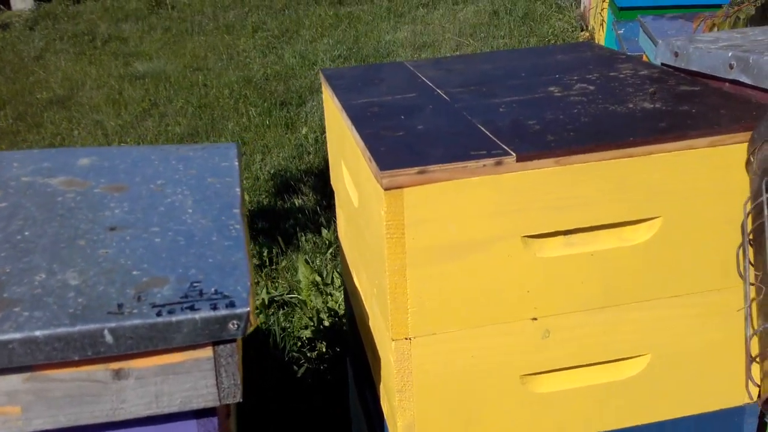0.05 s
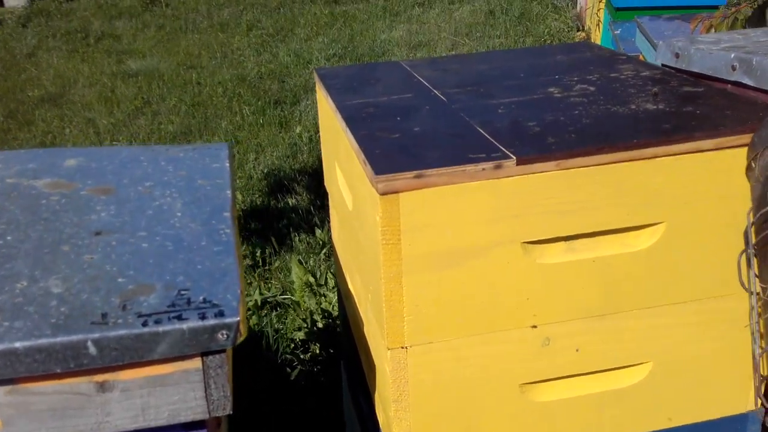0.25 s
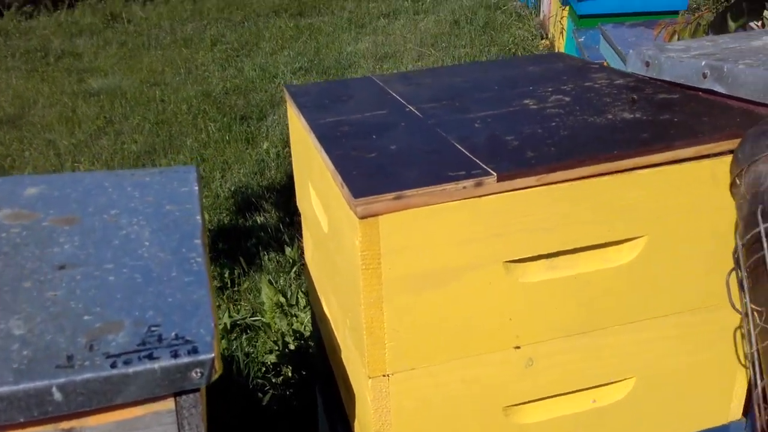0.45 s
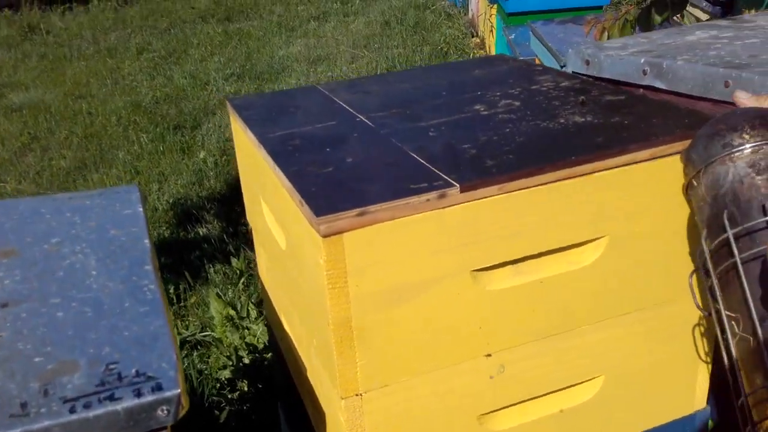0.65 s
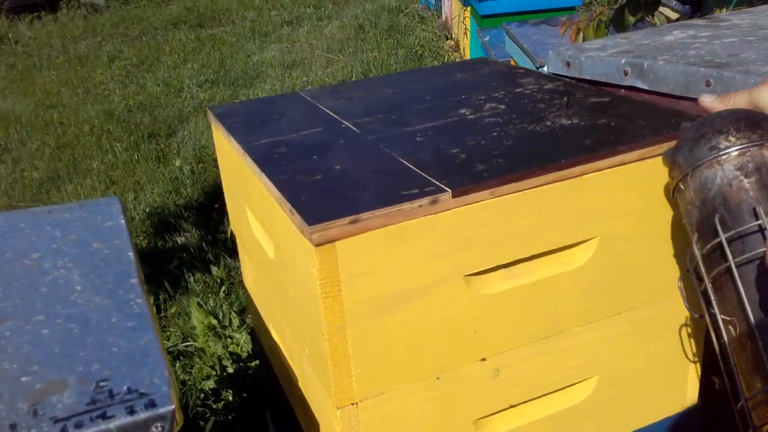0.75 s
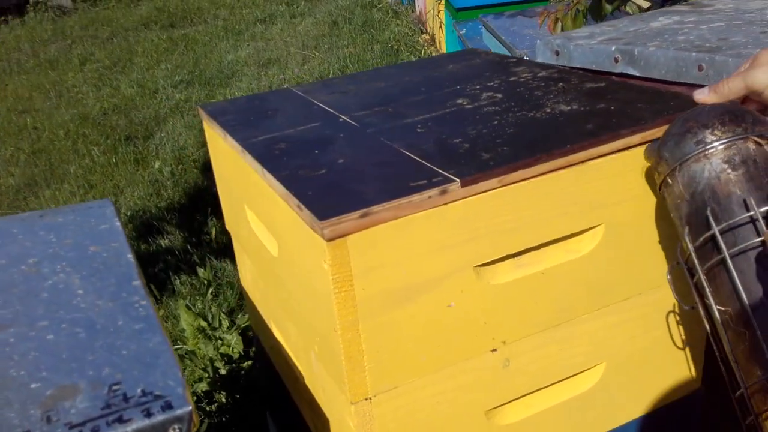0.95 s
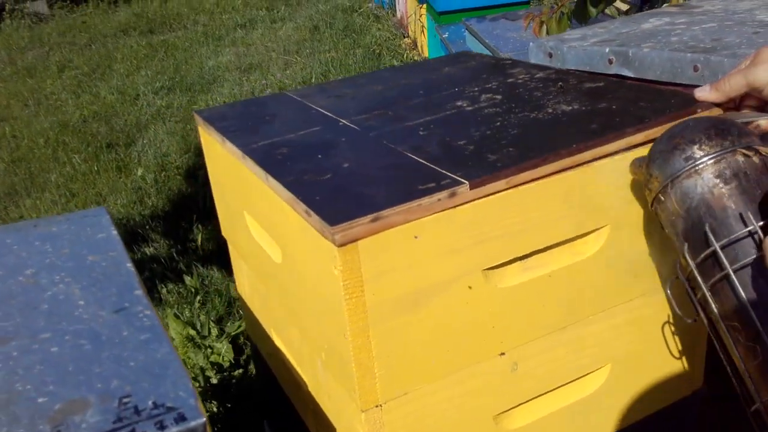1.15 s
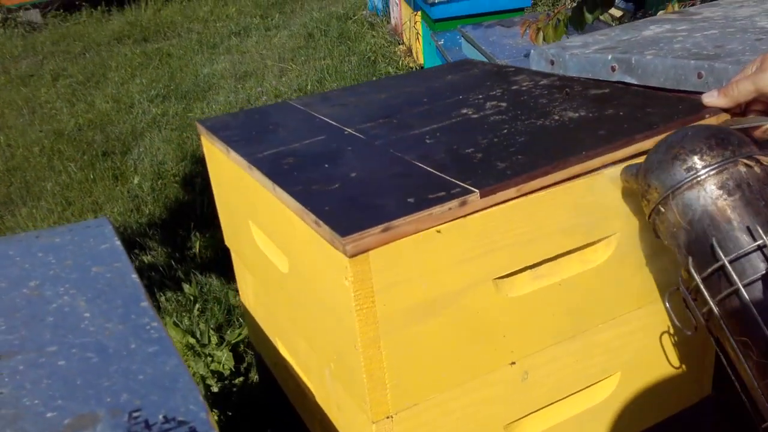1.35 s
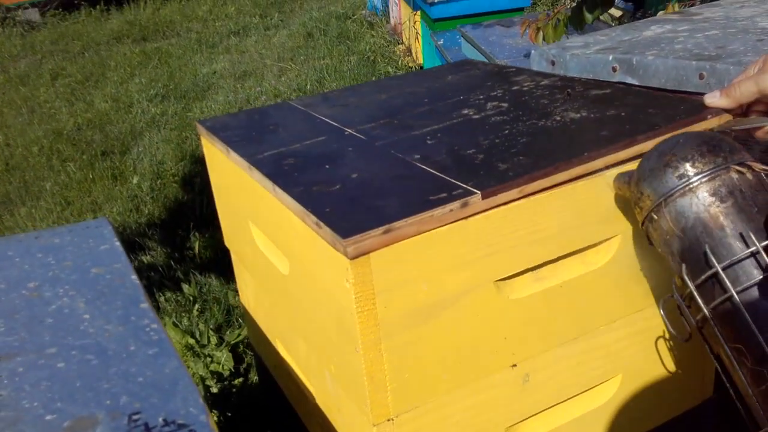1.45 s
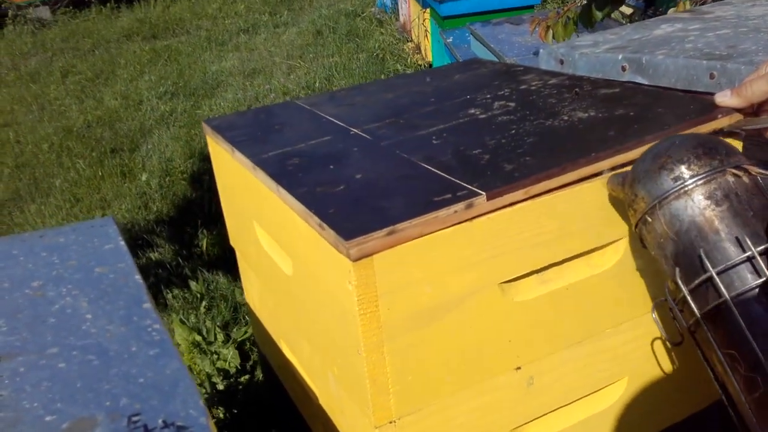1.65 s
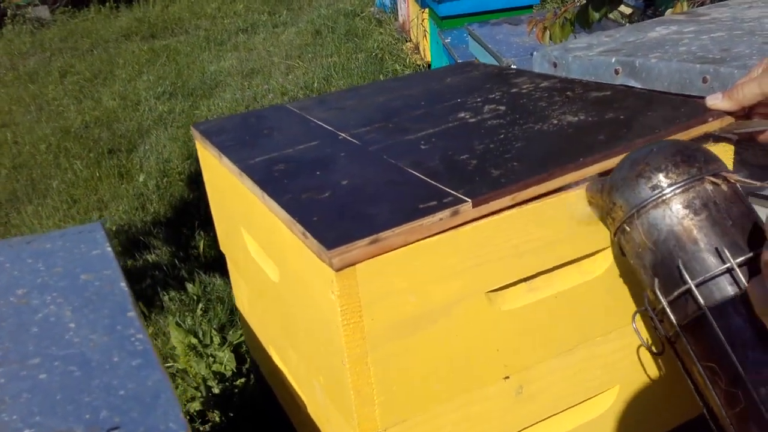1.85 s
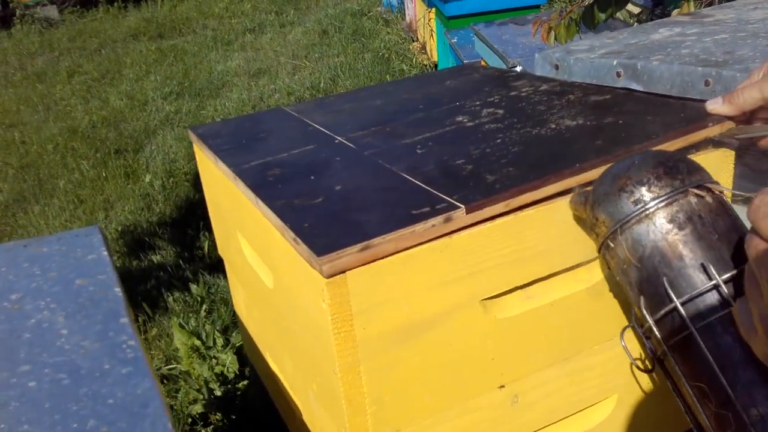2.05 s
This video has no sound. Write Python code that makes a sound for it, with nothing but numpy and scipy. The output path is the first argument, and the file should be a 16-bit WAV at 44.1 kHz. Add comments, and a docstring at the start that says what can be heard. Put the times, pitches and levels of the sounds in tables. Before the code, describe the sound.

A stuck wooden beehive lid gives with dry cracks and a hollow knock, just after a metal smoker clinks close by. Soft bellows puffs, more cracks and clinks follow, over faint bees and a gentle outdoor rush.

```python
"""On a lawn, at a wooden beehive: a metal bee smoker is brought up close and its fittings clink.
The stuck lid gives in a run of dry, splintery cracks and one hollow knock from the box, then cracks
again as it is prised. The bellows push breathy puffs through the nozzle, two apart and then a pair
that run together. Underneath, wingbeats hum faintly in a soft outdoor rush."""
import sys
import numpy as np
from scipy import signal
from scipy.fft import rfft, irfft
from scipy.io import wavfile

SR = 44100
rng = np.random.default_rng(int(sys.argv[2]) if len(sys.argv) > 2 else 0)


def transcribe(u):
    """Save the signal u as a 16-bit wav file named by the first command-line argument.

    u: samples, shape (n,) or (channels, n), limited to [-1, 1]; the rate is SR.
    q: integer samples, one column per channel.
    """
    v = np.clip(np.atleast_2d(u).T, -1, 1)
    q = np.round(v * 32767).astype(np.int16)
    wavfile.write(sys.argv[1], SR, q)


N = 92610
T = np.arange(N) / SR

# slips of the lid: (time [s], level [dB], core [Hz], core boost [dB], top edge [Hz],
# splinters [dB], bright tick [dB])
LID_CRACKS = [(0.3844, -25, 2580, 14, 5400, -5, -34), (0.3973, -15.5, 2700, 5, 5600, -17, -33),
              (.4030, -11, 2920, 5, 4600, -10.5, -33), (0.4083, -13.5, 3010, -4, 4600, -9.5, -27),
              (0.4087, -27, 3400, 3, 5000, -8, -33), (0.413, -18.5, 2920, 2, 4700, -3.5, -26.5),
              (0.4146, -9.5, 3300, 11, 4500, -9, -33), (0.4174, -5.5, 3550, 12, 4070, -25, -36),
              (0.4612, -33, 3380, 6, 4270, -17, -11), (.4640, -31.5, 3280, 3, 4400, -23, -24),
              (.5068, -39, 3500, -1, 4370, -14, -18.5), (1.3178, -39, 3500, 3, 4960, -8, -27),
              (1.3339, -14, 2500, 2, 4400, -16.5, -29), (1.3509, -15.5, 4170, 5, 4660, -22.5, -23),
              (1.5186, -23.5, 2400, 4, 3600, -32, -25), (1.5210, -3, 2600, 6, 3370, -19, -32.5)]
# short ring of the lid's boards: (frequency [Hz], level [dB], t60 [s])
BOARD_MODES = [(982, -34, 0.026), (1040, -38, .035), (1406, -40, 0.018), (1958, -20.5, 0.024),
               (2305, -34, 0.0237), (2560, -40, 0.016), (3324, -30, 0.012)]
# hollow body of the hive box: (frequency [Hz], level [dB], t60 [s])
BOX_MODES = [(102.5, -21.5, 0.087), (156, -23.5, 0.038), (271, -10.5, 0.15), (402, -11, 0.08),
             (462, -14.5, 0.025), (600, -35, 0.032), (850, -22, 0.077), (939, -1.5, 0.029),
             (1120, -7, 0.028), (1440, 1.5, 0.037), (1720, -5.5, .028), (2874, -1.5, 0.022),
             (3272, -1.5, 0.025), (3585, -18, .028), (4040, -3.5, 0.027)]
# colour of wood scraping on wood: (frequency [Hz], level [dB])
SCRAPE_COLOUR = [(60, -9), (250, -14), (1000, 1), (3800, -6.5), (5500, -20), (8000, -16.5), (16000, -33)]
# metal on metal: (time [s], level [dB], core [Hz], top edge [Hz], clatter [dB],
# bright tick [dB], ring [dB])
SMOKER_HITS = [(.1238, -39.5, 3260, 4700, -5, -15, 9.5), (0.2117, -29, 2790, 4670, -13, -20, 2),
               (0.2382, -20.5, 2380, 4830, -4, -21.5, 6), (.2665, -37, 3300, 4130, -7, -18, 2),
               (0.271, -30, 2100, 4360, -6, -24, 0), (0.2816, -32.5, 2400, 4570, -8.5, -26, -2),
               (0.3014, -21, 2860, 4300, -9.5, -24, -6), (1.4943, -37, 1800, 4200, -13, -22, 1),
               (1.8895, -23.5, 2800, 3650, -9.5, -8.5, -3), (1.8921, -21, 980, 3680, -10, -33, -4.5),
               (1.8990, -36.5, 4300, 4900, -8, -13, 1), (1.93, -28.5, 2840, 4100, -14, -8, -3),
               (2.0860, -37.5, 2300, 4400, -7, -25.5, 0)]
# tinny ring of the smoker: (frequency [Hz], level [dB], t60 [s])
SMOKER_MODES = [(853, -22, 0.047), (1070, -31, 0.026), (1360, -22, 0.048), (1603, -20.5, 0.044),
                (2192, -15, 0.049), (2440, -23, .035), (2640, -28, 0.021), (3060, -28, 0.033),
                (3460, -24, 0.038), (4050, -23, 0.035), (5400, -24.5, 0.0201)]
# squeezes of the bellows: (start [s], length [s], level [dB], hiss boost [dB])
BELLOWS_STROKES = [(1.069, .142, -32.5, 4.0), (1.353, 0.14, -38, 1.0), (1.946, 0.15, -39, -2.5),
                   (2.05, 0.072, -46, 10)]
# colour of air through the nozzle: (frequency [Hz], level [dB])
NOZZLE_COLOUR = [(40, -42), (110, -33), (160, -10), (280, -3.5), (430, -3.5), (530, 3), (660, -6.5),
                 (900, 2), (1200, -6.5), (1450, -1), (2000, -3), (2450, -8), (2850, -7), (3500, -17),
                 (4000, -17), (5100, -29.5), (7200, -27), (10000, -36), (16000, -44)]
# one voice per bee: (wingbeat [Hz], level relative to the rush [dB])
BEE_VOICES = [(192, -18.5), (216, -13.5), (284, -16)]
# buzz of a wing: (harmonic [multiple of the wingbeat], level [dB])
WING_HARMONICS = [(1, -11), (2, 0.5), (3, -14), (4, -8), (5, -6), (6, -17)]
# fader ride shared by the rush and the bees: (time [s], level [dB])
AMBIENCE_RIDE = [(0, -48.5), (.09, -54.5), (.19, -56), (.28, -49), (.37, -53.5), (.44, -49.5), (.53, -45.5),
                 (.57, -50.5), (.76, -55), (.85, -56.5), (.97, -54), (1.06, -56), (1.24, -56),
                 (1.30, -48.5), (1.40, -50), (1.55, -48.5), (1.65, -47.5), (1.73, -54), (1.82, -56.5),
                 (1.94, -50), (2.1, -48)]
# colour of the outdoor rush: (frequency [Hz], level [dB])
AIR_COLOUR = [(25, -30), (70, -24.5), (120, -23.5), (190, -7.5), (290, -5), (420, 3.5), (520, -2.5),
              (700, -4), (900, 1), (1400, 0.5), (2100, -2), (3000, -10.5), (4000, -16.5), (5300, -26.5),
              (8000, -22.5), (11000, -27), (16000, -31.5)]
# dull reflections off ground and boxes: (delay [s], level [dB])
YARD_ECHOES = [(.0013, -34.5), (.003, -14.5), (.0066, -27)]

KNOCK_S, KNOCK_DB = .4175, -21.5  # the lid comes free
SCRAPE_DB, SCRAPE_T60_S = -38, .13
SCATTER_T60_S, TAIL_DB, TAIL_TOP_HZ = .011, -3.5, 2940
CORE_WIDTH_HZ, SNAP_LOW_HZ = 940, 868
TICK_HZ, TICK_WIDTH_HZ, TICK_TOP_HZ = 8170, 1800, 13000
NOZZLE_HISS_HZ, NOZZLE_HISS_OCTAVES = 2320, .63
BEE_PITCH_SPREAD, BEE_SWELL_DB = .02034, 4
YARD_TAIL_DB, YARD_T60_S = -35, .24
HISS_DB, RUMBLE_DB = -71.5, -96


def hive_lid():
    """The lid slips in cracks; as it lets go the box knocks once and the wood scrapes briefly."""
    out = np.zeros(N)
    for start, db, core_hz, core_db, top_hz, splinter_db, tick_db in LID_CRACKS:
        crack = contact(core_hz, core_db, top_hz, splinter_db, tick_db,
                        bass_db=-43, tail_t60=.029, ringing=ring(BOARD_MODES))
        add(out, start, from_db(db) * crack)
    knock = cut(cut(ring(BOX_MODES, size=12000), 140, "high"), 3900, "low", order=6)
    scrape = noise(SCRAPE_COLOUR) * decay(SCRAPE_T60_S, size=N)
    add(out, KNOCK_S, from_db(KNOCK_DB) * knock)
    add(out, KNOCK_S, from_db(SCRAPE_DB) * scrape)
    return out


def smoker_clinks():
    """The smoker's can and wire guard touch, clatter and ring."""
    out = np.zeros(N)
    for start, db, core_hz, top_hz, clatter_db, tick_db, ring_db in SMOKER_HITS:
        metal = from_db(ring_db) * ring(SMOKER_MODES)
        clink = contact(core_hz, core_db=1.5, top_hz=top_hz, scatter_db=clatter_db, tick_db=tick_db,
                        bass_db=-24, tail_t60=.035, ringing=metal)
        add(out, start, from_db(db) * clink)
    return out


def contact(core_hz, core_db, top_hz, scatter_db, tick_db, bass_db, tail_t60, ringing, size=6000):
    """One hit: a pulse and a scatter of tiny ones give snap, low weight and a tick over the ring."""
    def snap_band(x):
        """Lift the broad core resonance and trim both ends."""
        boosted = x + from_db(core_db) * resonance(x, core_hz, CORE_WIDTH_HZ)
        return cut(cut(boosted, SNAP_LOW_HZ, "high", order=5), top_hz, "low", order=6)

    pulse = signal.unit_impulse(size)
    scatter, tail = from_db(scatter_db) * .5 * rng.standard_normal((2, size))
    attack = pulse + scatter * decay(SCATTER_T60_S)
    tail = from_db(TAIL_DB) * tail * decay(tail_t60)
    snap = snap_band(attack + cut(tail, TAIL_TOP_HZ, "low", order=3))
    bass = cut(cut(attack + tail, 250, "high", order=3), 610, "low")
    tick = cut(resonance(attack + tail, TICK_HZ, TICK_WIDTH_HZ), TICK_TOP_HZ, "low", order=1)
    body = cut(cut(ringing, 628, "high", order=4), top_hz, "low", order=6)
    # the bare pulse's peaks set the scale of the layers
    snap_peak = np.abs(snap_band(pulse)).max()
    tick_peak = np.abs(resonance(pulse, TICK_HZ, TICK_WIDTH_HZ)).max()
    return (snap + from_db(bass_db) * bass) / snap_peak + from_db(tick_db) * tick / tick_peak + body


def ring(modes, size=6000):
    """A struck body: dying modes of alternating polarity, each at a slightly random strength."""
    out = np.zeros(size)
    for k, (hz, db, t60) in enumerate(modes):
        strength = (-1) ** k * from_db(db + rng.normal())
        out += strength * np.cos(2 * np.pi * hz * T[:size]) * decay(t60, size)
    return out


def bellows():
    """Each squeeze drives a smooth swell of air through the nozzle."""
    out = np.zeros(N)
    for start, length, db, hiss_db in BELLOWS_STROKES:
        squeeze = np.clip((T - start) / length, 0, 1)
        flow = np.abs(np.sin(np.pi * squeeze)) ** 1.6
        out += from_db(db) * flow * noise(NOZZLE_COLOUR, hiss_db)
    return out


def bees():
    """Beating wings make buzzy tones, each wandering in pitch and level."""
    out = np.zeros(N)
    for hz, db in BEE_VOICES:
        wingbeat_hz = hz * (1 + BEE_PITCH_SPREAD * drift(rate_hz=7.6))
        phase = 2 * np.pi * np.cumsum(wingbeat_hz) / SR
        buzz = sum(from_db(harmonic_db) * np.sin(k * phase) for k, harmonic_db in WING_HARMONICS)
        out += from_db(db + BEE_SWELL_DB * drift(rate_hz=3.3)) * buzz
    return out


def ambience():
    """A soft outdoor rush with the bees tucked inside; both swell and dip together."""
    ride_db = np.interp(T, *np.transpose(AMBIENCE_RIDE))
    return from_db(ride_db) * (noise(AIR_COLOUR) + bees())


def yard(x):
    """Ground and boxes throw back close reflections and a faint, dull tail."""
    response = np.zeros(N)
    for delay, db in YARD_ECHOES:
        add(response, delay, from_db(db) * cut(signal.unit_impulse(64), 3800, "low"))
    tail = cut(cut(rng.standard_normal(N), 2100, "low"), 400, "high") * decay(YARD_T60_S, size=N)
    response += from_db(YARD_TAIL_DB) * tail / np.linalg.norm(tail)
    return signal.fftconvolve(x, response)[:N]


def noise_floor():
    """A faint, steady bed of hiss and low rumble."""
    hiss = rng.standard_normal(N)
    rumble = unit_rms(cut(rng.standard_normal(N), 140, "low"))
    return from_db(HISS_DB) * hiss + from_db(RUMBLE_DB) * rumble


def noise(colour, hiss_db=0):
    """Coloured noise at unit power; hiss_db lifts a broad bell at the nozzle's hiss."""
    hz, db = np.transpose(colour)
    octave = np.log2(np.maximum(np.fft.rfftfreq(N, 1 / SR), 10))
    bell = np.exp(-.5 * ((octave - np.log2(NOZZLE_HISS_HZ)) / NOZZLE_HISS_OCTAVES) ** 2)
    eq_db = np.interp(octave, np.log2(hz), db) + hiss_db * bell
    return unit_rms(irfft(rfft(rng.standard_normal(N)) * from_db(eq_db), N))


def drift(rate_hz):
    """Slow random wander at unit power."""
    return unit_rms(cut(rng.standard_normal(2 * N), rate_hz, "low")[N:])


def decay(t60, size=6000):
    """An envelope that falls 60 dB in t60 seconds."""
    return np.exp(-np.log(1000) * T[:size] / t60)


def resonance(x, hz, width_hz):
    """A single resonant band-pass."""
    return signal.lfilter(*signal.iirpeak(hz, hz / width_hz, fs=SR), x)


def cut(x, hz, kind, order=2):
    """Butterworth low- or high-pass."""
    return signal.sosfilt(signal.butter(order, hz, kind, fs=SR, output="sos"), x + 1e-18)


def add(out, start, x):
    """Drop a sound into the track at start seconds."""
    i = int(start * SR)
    out[i:i + len(x)] += x[:max(N - i, 0)]


def from_db(db):
    """Decibels to gain."""
    return 10 ** (np.asarray(db) / 20)


def unit_rms(x):
    """Scale to unit power."""
    return x / np.sqrt(np.mean(x ** 2) + 1e-20)


def scene():
    """Mono mix: wood and metal up front with their echoes, dry puffs, the apiary behind."""
    hits = smoker_clinks() + hive_lid()
    background = ambience() + noise_floor()
    return (hits + yard(hits) + bellows() + background)[None]


def record(dry):
    """The microphone loses the deep bass; the top is cut steeply."""
    thin = cut(dry, 44.8, "high")
    top_cut = signal.ellip(10, .1, 70, 16100, fs=SR, output="sos")
    return signal.sosfilt(top_cut, thin)


dry = scene()
out = record(dry)
transcribe(out)
```